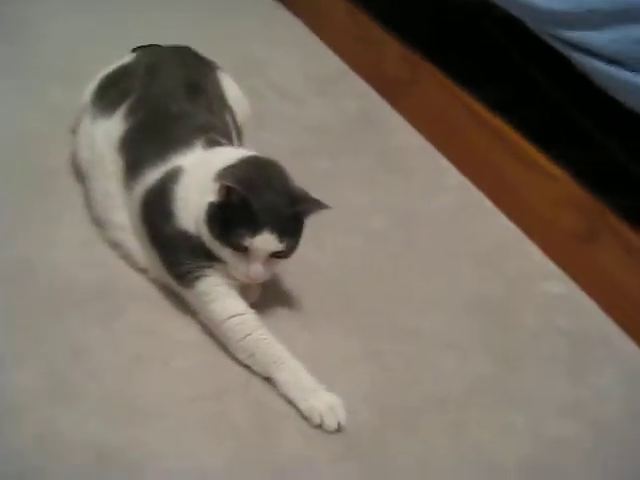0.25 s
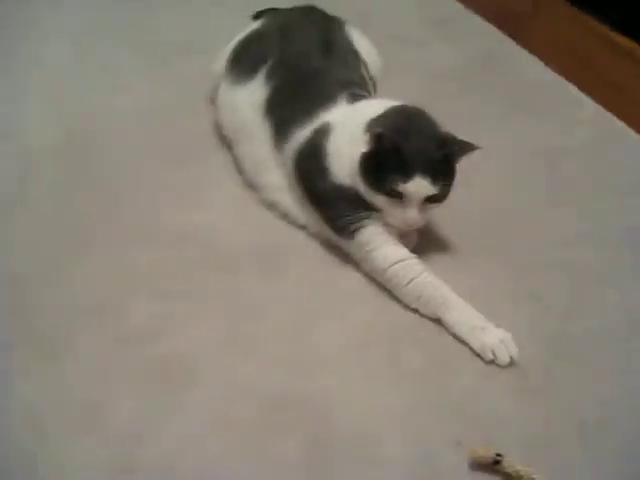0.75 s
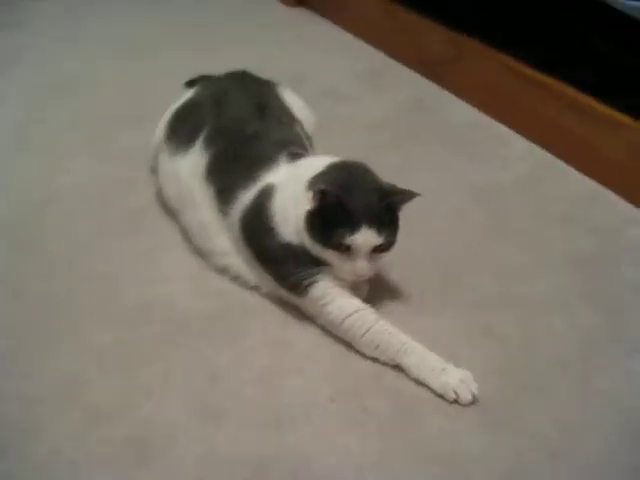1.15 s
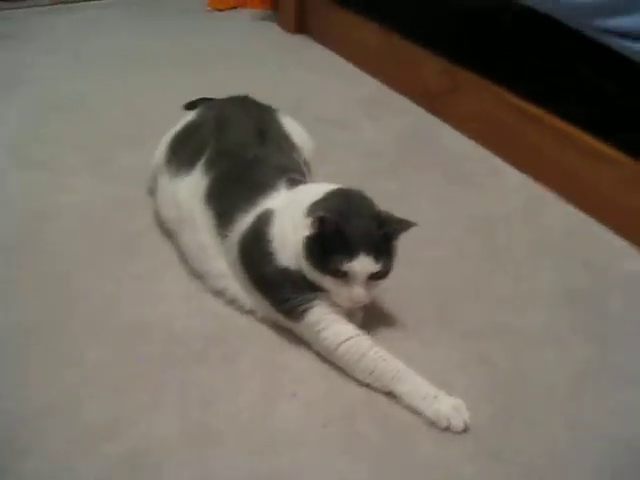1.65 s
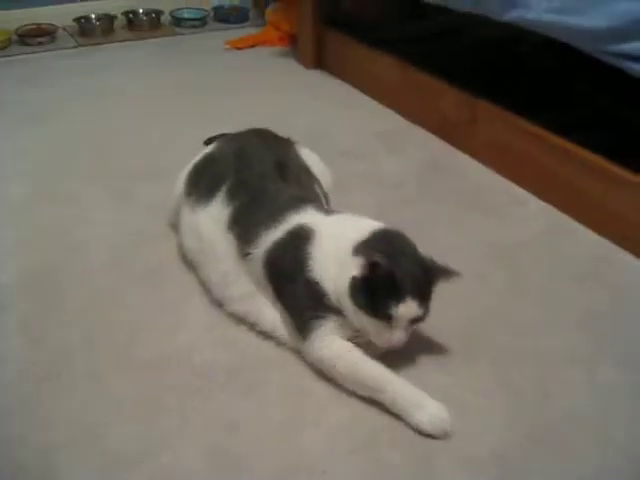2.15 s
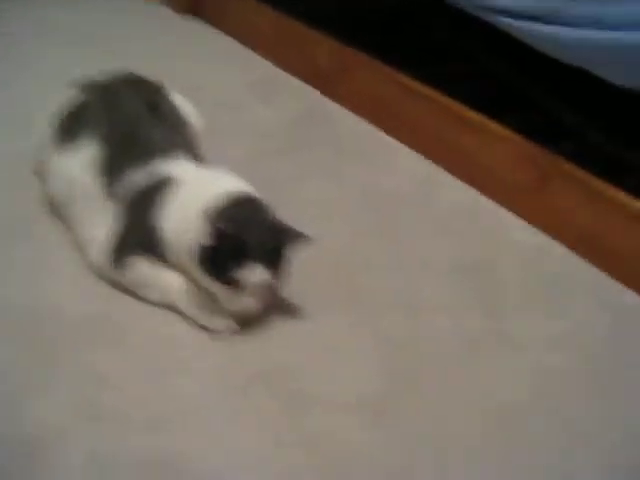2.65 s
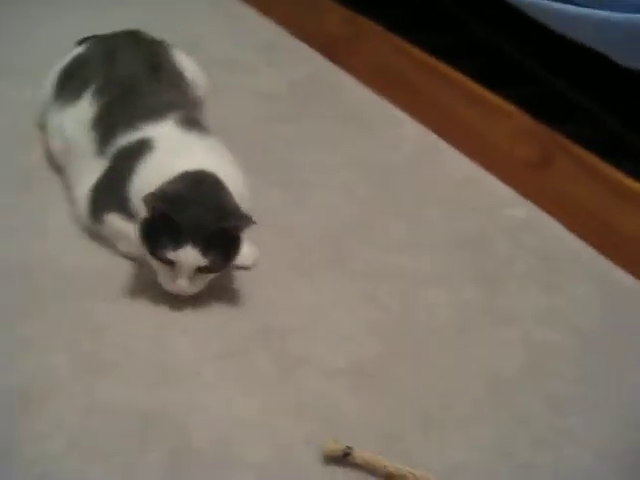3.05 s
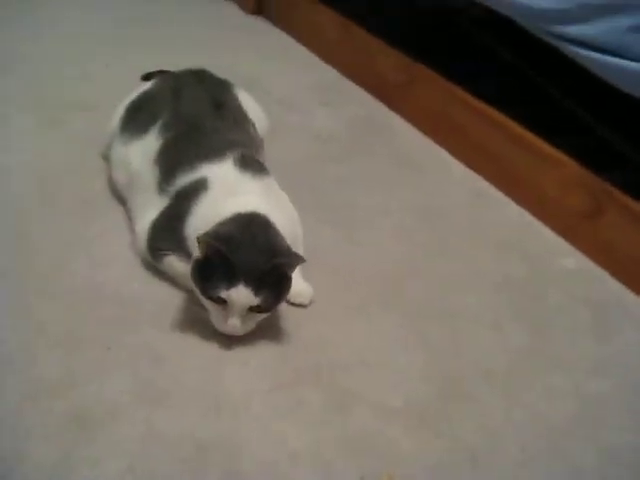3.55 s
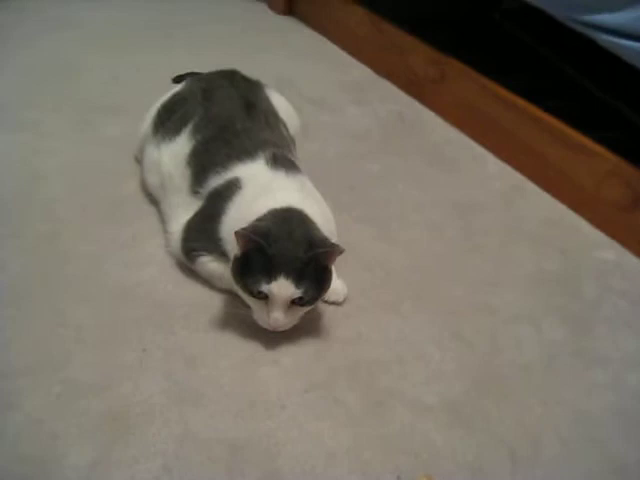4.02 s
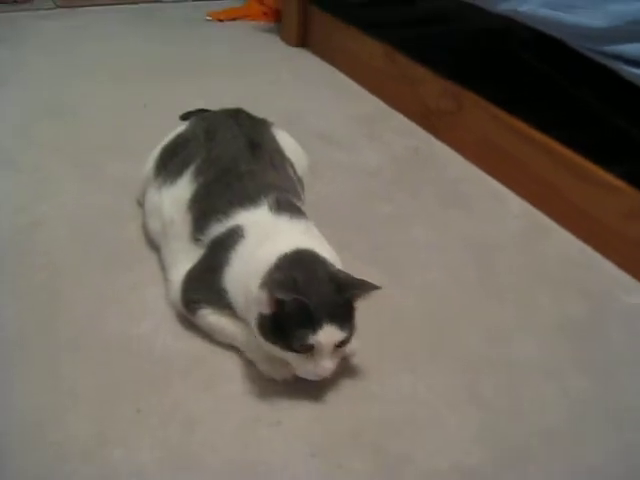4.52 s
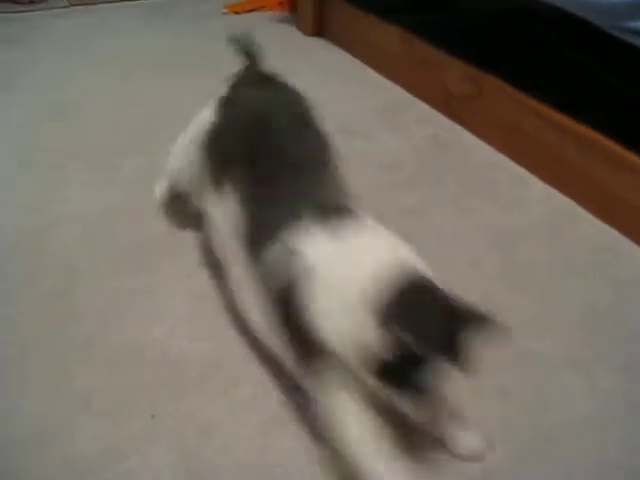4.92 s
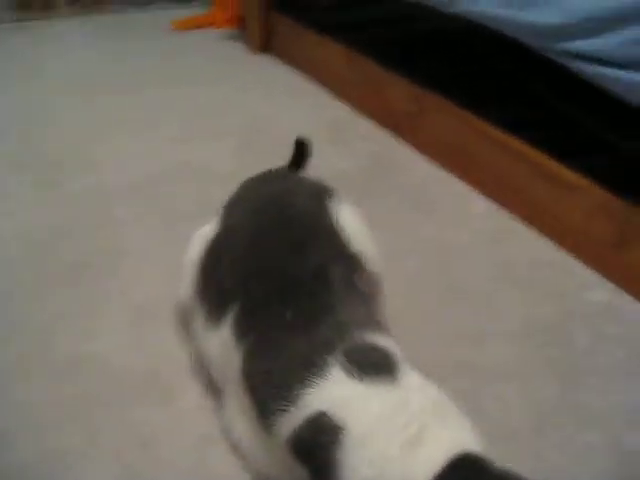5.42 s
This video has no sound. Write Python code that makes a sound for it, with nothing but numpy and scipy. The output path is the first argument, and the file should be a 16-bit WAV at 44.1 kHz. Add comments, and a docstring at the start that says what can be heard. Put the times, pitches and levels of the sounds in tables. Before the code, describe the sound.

A quiet room with a steady low hiss, heard close and dry through a hand-held camera. Right at the start a sharp plastic click sounds, followed by quick scuffs of fingers on the casing and smaller clicks until about 0.9 seconds. The rubbing returns at 1.2 seconds and thickens into a cluster of rasps and ticks around 1.7 to 1.9. From 2.1 to 2.8 seconds come lighter scrapes, tiny fingernail squeaks and, at 2.5, one faint, brief metal ping. After a lull with a few small ticks, the loudest click snaps at about 3.75 seconds with a slight bump, trailed by short scuffs. Only hiss remains from 4 seconds. At about 4.9 a cat gets up: its fur brushes the carpet in one soft, uneven swell, with four faint, muffled paw thuds, fading by 5.5 seconds.

```python
"""Cat on a carpet, with handling noise

A cat paws at a carpet in a quiet room, then gets up and pads away with soft thuds and a rustle of fur.
The close scuffs and clicks are most likely fingers shifting on a small hand-held camera: stick-slip
friction drives the modes of its plastic shell. A nail squeaks, and one touch pings a small metal part.
Under it all lie room noise and hiss."""
import sys
import numpy as np
from scipy import signal
from scipy.fft import rfft, irfft, next_fast_len
from scipy.io import wavfile
from scipy.ndimage import uniform_filter1d, map_coordinates

SR = 44100
rng = np.random.default_rng(int(sys.argv[2]) if len(sys.argv) > 2 else 0)


def dump_mix(stems):
    """Bounce the given channels to the path in sys.argv[1] as a 16-bit WAV at rate SR."""
    frames = np.atleast_2d(stems).T  # one column per channel
    limited = np.clip(frames, -1, 1)  # hard clip at full scale
    pcm = np.round(limited * 32767).astype(np.int16)
    wavfile.write(sys.argv[1], SR, pcm)


N = 250488

# Modes of the plastic shell. Each row: frequency in Hz, 60 dB decay time in seconds, level in dB.
SHELL_MODES = [(884, 0.027, -17.5), (1200, 0.02, -18), (1488, 0.022, -8), (1707, 0.034, -1),
               (1950, 0.03, -15)]


def amp(db):
    """Amplitude ratio of a level in decibels."""
    return 10 ** (np.asarray(db) / 20)


def unit(x):
    """Normalisation to rms 1."""
    return x / np.sqrt(np.mean(x ** 2) + 1e-20)


def clock():
    """The time of every sample in seconds."""
    return np.arange(N) / SR


def noise():
    """White Gaussian noise: equal mean power at all frequencies."""
    return rng.standard_normal(N)


def add(track, start_s, sound):
    """Superposition: the sound is added to the track from start_s on."""
    start = max(round(start_s * SR), 0)
    track[start:start + len(sound)] += sound[:max(len(track) - start, 0)]


def filtered(x, response):
    """Linear filtering: the spectrum of x is multiplied by a frequency response."""
    size = next_fast_len(len(x) + SR // 20)
    hz = np.fft.rfftfreq(size, 1 / SR)
    return irfft(rfft(x, size) * response(hz), size)[:len(x)]


def coloured(x, points):
    """Spectral shaping by a curve through (Hz, dB) points, at rms 1."""
    point_hz, db = np.transpose(points)
    return unit(filtered(x, lambda hz: amp(np.interp(np.log(hz + 1), np.log(point_hz), db))))


def ringing(modes):
    """Impulse response: each (Hz, 60 dB decay time, dB) mode is a damped sinusoid."""
    t = np.arange(SR // 8) / SR
    return sum(amp(db - 60 * t / t60) * np.sin(2 * np.pi * hz * t) for hz, t60, db in modes)


def driven(force, modes):
    """Forced vibration: the force is convolved with the impulse response of the modes."""
    return signal.fftconvolve(force, ringing(modes))[:len(force)]


def shell_treble(x):
    """Resonance: the shell's upper modes lift narrow bands of x; the result has rms 1."""
    # Upper resonances. Each row: centre in Hz, width in Hz, lift in dB.
    peaks = [(2630, 210, 5), (3330, 110, 2), (4030, 120, 5), (4550, 200, 1.5), (5500, 180, 5),
             (5860, 130, 4), (6370, 140, 1.5)]

    def response(hz):
        return amp(sum(db / (1 + (2 * (hz - centre) / width) ** 2) for centre, width, db in peaks))
    return unit(filtered(x, response))


def friction(size, slips_per_s, spread_db, smooth):
    """Stick-slip friction: random uneven impulses, with a share `smooth` of the power as steady noise."""
    strength, side, hiss = rng.standard_normal((3, size))
    slipping = rng.random(size) < slips_per_s / SR
    slips = slipping * amp(spread_db * np.clip(strength, -2, 2)) * np.sign(side)
    return np.sqrt(1 - smooth) * unit(slips) + np.sqrt(smooth) * hiss


def room(noise_db=-54.5, shell_db=-68, whine_db=-85, whine_hz=15734):
    """Stationary noise: room sound and hiss, faint resonance of the shell, and a thin high whine."""
    # Spectrum of the background. Each row: frequency in Hz, relative level in dB.
    spectrum = [(12, -38), (20, -11.5), (95, -5), (126, -5.5), (225, -5.5), (478, -8), (811, -6),
                (1010, -9.5), (1200, -5), (1720, -8.5), (2030, -11.5), (6540, -18.5), (7950, -23.5),
                (10500, -21.5), (15500, -26.5)]
    background = amp(noise_db) * coloured(noise(), spectrum)
    shell = amp(shell_db) * unit(driven(noise(), SHELL_MODES))
    whine = amp(whine_db) * np.sqrt(2) * np.sin(2 * np.pi * whine_hz * clock())
    return background + shell + whine


def finger_slides(edge_s=0.0034, swell_db=9, ease_db=7, treble_growth=1.5,
                  focus_db=6, focus_half_width_hz=600, fizz_db=-18, fizz_lift_db=7.5, fast_hz=5870):
    """Sliding friction under rising, then easing pressure: coarse slips ring the shell, fine ones hiss."""
    # Finger strokes. Each row: start, attack and release in seconds, level in dB,
    # rasp in dB relative to that level, rasp centre in Hz.
    strokes = [(0, 0.0036, 0.034, -36.5, -20, 4200), (.037, .025, 0.041, -33, -18.5, 5200),
               (.089, .012, 0.033, -41.5, -13, 5000), (.168, .06, 0.071, -54.5, -14, 5200),
               (.289, 0.041, 0.07, -43, -14.5, 3100), (.479, .018, .105, -45, -3.5, 6500),
               (.59, 0.037, 0.061, -44, -6, 3700), (.681, .06, .1, -48.5, -9, 4800),
               (.83, .064, .018, -42.5, -2.5, 5900), (1.218, .05, .045, -45, -19, 3000),
               (1.328, 0.015, 0.062, -43.5, -13.5, 3000), (1.478, .004, 0.055, -51, -7, 3900),
               (1.56, 0.088, 0.083, -50, -3.5, 4400), (1.668, 0.017, 0.02, -42, -1, 3930),
               (1.732, 0.012, 0.036, -36, -14.5, 5800), (1.8, .017, 0.0072, -33.5, -12, 6100),
               (1.841, 0.025, 0.051, -47.5, -17, 5200), (2.13, 0.071, .035, -56, -8, 5800),
               (2.197, 0.061, 0.034, -39, -2, 5820), (2.315, 0.012, .06, -46, -8, 6000),
               (2.409, .031, .06, -61.5, 4, 6360), (2.547, 0.09, .1, -50.5, -11.5, 4500),
               (2.735, .028, .022, -52, -5, 7520), (3.589, 0.0043, 0.014, -41, -7, 2800),
               (3.669, .013, .07, -52.5, -9, 3400), (3.781, 0.07, 0.061, -54.5, -10, 3000),
               (3.885, .02, 0.015, -37, -3, 5850), (3.924, .009, 0.0068, -38, -3.5, 5900)]
    # Spectra of the dull rub, dry rasp and fine fizz. Each row: frequency in Hz, relative level in dB.
    rub_spectrum = [(150, -26), (500, -32), (820, -6.5), (1100, 1), (1450, 5.5), (1900, -2), (2400, -13.5),
                    (4000, -34)]
    rasp_spectrum = [(1400, -53), (2200, -6), (2650, 2.5), (3100, 2), (3500, 0.5), (4200, -2), (4900, -3.5),
                     (5800, -2.5), (6600, -4.5), (7600, -16), (9500, -45)]
    fizz_spectrum = [(6000, -21), (8300, 0.5), (9500, 3), (11000, -1.5), (13200, 1.5), (16000, -6)]
    track, t = np.zeros(N), np.arange(SR // 4) / SR
    for start, attack, release, db, rasp_db, rasp_hz in strokes:
        length = attack + release
        contact = np.clip(np.minimum(t, length - t) / edge_s, 0, 1)
        from_peak = np.abs(np.interp(t, [0, attack, length], [-1, 0, 1]))
        pressure = contact * amp(-np.where(t < attack, swell_db, ease_db) * from_peak ** 1.5)
        coarse = pressure * friction(len(t), slips_per_s=700, spread_db=4, smooth=0.2)
        drag = pressure * friction(len(t), slips_per_s=600, spread_db=4.5, smooth=0.25)
        fine = pressure ** treble_growth * friction(len(t), slips_per_s=3000, spread_db=2.5, smooth=0.34)
        fine += 0.35 * coarse
        # a dull stroke is soft skin, which damps the shell's ring into a broad rub
        softness = np.clip(-rasp_db / 24, 0.05, 0.5)
        ring = coloured(driven(coarse, SHELL_MODES), [(200, -16), (700, 1)])
        body = np.sqrt(1 - softness) * ring + np.sqrt(softness) * coloured(drag, rub_spectrum)
        # a faster slide rasps higher and fizzes much more
        focus = lambda hz: amp(focus_db / (1 + ((hz - rasp_hz) / focus_half_width_hz) ** 2))
        rasp = unit(filtered(shell_treble(coloured(fine, rasp_spectrum)), focus))
        fizz = amp(fizz_db + fizz_lift_db * (rasp_hz / fast_hz) ** 4) * coloured(fine, fizz_spectrum)
        stroke = body + amp(rasp_db) * (rasp + fizz)
        duty = np.mean(t < length)  # refers the rms level to the time in contact
        add(track, start, amp(db) * stroke * np.sqrt(duty))
    return track


def ticks(rise_s=0.0006):
    """Noise transients: brief high treble ticks, some alone, some the bright edge of a finger click."""
    # Treble ticks. Each row: time of the peak in seconds, level in dB.
    bursts = [(0.0152, -37.5), (0.164, -39.5), (.672, -42), (1.592, -48), (1.7207, -37), (1.834, -35.5),
              (3.577, -40)]
    envelope, t = np.zeros(N), np.arange(SR // 50) / SR
    for peak_s, db in bursts:
        add(envelope, peak_s - rise_s, amp(db) * t / rise_s * np.exp(1 - t / rise_s))
    return envelope * coloured(noise(), [(4000, -21), (8500, -7), (11000, 1), (14000, 1), (16000, -6)])


def finger_clicks(ring_db=-12.5, grip_damping=0.17, build_s=0.0021, crack_lift_db=3, crack_decay_s=0.0012):
    """Elastic release: a catch lets go, and the shell flexes for a few cycles, cracks and rings on."""
    # Catches and slips. Each row: time in seconds, flex level in dB, pitch in Hz, flex length in
    # seconds, crack in dB relative to the flex before crack_lift_db is added.
    catches = [(.016, -2.5, 1475, 0.00098, -24.5), (0.0282, -18.5, 1480, .0006, -13),
               (.0435, -20, 1610, 0.0012, -19), (0.1643, -7.5, 1385, 0.00067, -20.5),
               (0.3385, -19.5, 1630, 0.0012, -12), (0.486, -25, 1640, 0.0017, -9),
               (0.5238, -12.5, 1200, 0.00072, -16.5), (.592, -27, 1690, 0.0014, -16),
               (1.0656, -22, 1620, .0011, -12.5), (1.3345, -30, 1470, .0027, -16),
               (1.475, -22, 1100, .0007, -13.5), (1.6497, -20, 1490, .00081, -6.5),
               (1.722, -19, 1610, 0.0028, -13.5), (1.774, -22.5, 1570, .0018, -21),
               (1.823, -20.5, 1540, 0.0029, -19), (1.8355, -19.5, 1675, 0.0043, -17.5),
               (1.958, -33, 1570, .0015, -24), (2.3402, -21.5, 1600, .0016, -21),
               (2.388, -28, 1700, 0.0035, -22), (2.4953, -29.5, 1640, .0018, -8),
               (2.655, -28, 1640, .0018, -9.5), (2.6649, -24.5, 1610, .0018, -31),
               (2.7346, -33, 1530, .0017, -25), (2.792, -33.5, 1600, 0.0019, -21),
               (2.901, -27, 1070, 0.00073, -29), (3.0606, -33.5, 1380, 0.00064, -22),
               (3.5945, -24.5, 1560, 0.00042, -12.5), (3.7545, -6, 1530, 0.0011, -18.5),
               (3.7578, 2, 1590, 0.0023, -30), (3.802, -25.5, 1580, 0.001, -19),
               (3.8755, -27.5, 1780, 0.00048, -8), (3.8879, -18, 1590, 0.0015, -3.5),
               (5.0242, -29.5, 1080, 0.00088, -18.5)]
    # The shell's deep knock. Each row: frequency in Hz, 60 dB decay time in seconds, level in dB.
    knock_modes = [(892, 0.02, -35)]
    flexes, rings, crack_envelope = np.zeros((3, N))
    lead_s = 0.01  # each pulse begins ahead of its peak
    t = np.arange(SR // 8) / SR - lead_s
    ring = ringing(SHELL_MODES) * (1 - np.exp(-(t + lead_s) / build_s))  # builds as the flexing dies
    for peak_s, db, hz, length, crack_db in catches:
        pulse = 1 / np.cosh(np.clip(2.95 * t / length, -50, 50))
        phase = 2 * np.pi * hz * t + rng.normal(0, 0.26)
        add(flexes, peak_s - lead_s, amp(db) * pulse * np.cos(phase))
        # a firm grip damps the ring, which loses grip_damping dB for each dB of force
        add(rings, peak_s, amp(ring_db + (1 - grip_damping) * db) * ring)
        burst = np.where(t < 0, pulse, np.exp(-np.abs(t) / crack_decay_s))
        add(crack_envelope, peak_s - lead_s, amp(db + crack_db + crack_lift_db) * burst)
    # so small a shell radiates little bass
    flexes = signal.sosfilt(signal.butter(3, 620, "high", fs=SR, output="sos"), flexes)
    # Spectrum of a crack. Each row: frequency in Hz, relative level in dB.
    crack_spectrum = [(300, -26), (1500, 6.5), (2600, 2.5), (4300, 2.5), (5200, -4.5), (6200, -2),
                      (7500, -16.5), (10000, -20.5), (16000, -27.5)]
    cracks = crack_envelope * shell_treble(coloured(noise(), crack_spectrum))
    return flexes + driven(flexes, knock_modes) + rings + cracks


def grip_bumps(low_cut_hz=140, t60_s=0.016):
    """Heavily damped oscillation: the firmest slips jolt the whole camera, and the hand stills it."""
    # Jolts. Each row: start in seconds, frequency in Hz, level in dB before the low cut.
    jolts = [(.05, 240, -39), (1.72, 230, -32), (1.834, 240, -38), (3.756, 310, -36)]
    track = np.zeros(N)
    for start, hz, db in jolts:
        add(track, start, ringing([(hz, t60_s, db)]))
    return signal.sosfilt(signal.butter(2, low_cut_hz, "high", fs=SR, output="sos"), track)


def nail_squeaks(waver_hz=250):
    """Stick-slip oscillation: a nail chatters on the plastic for a moment at one unsteady pitch."""
    # Squeaks. Each row: time of the peak in seconds, length in seconds, pitch in Hz, peak level in dB.
    squeaks = [(2.2, .012, 4600, -48), (2.442, .03, 6200, -54), (2.468, 0.0029, 6150, -43),
               (2.655, 0.0035, 3550, -35), (3.8745, 0.0014, 2900, -31)]
    track, t = np.zeros(N), np.arange(SR // 5) / SR - 0.1
    for peak_s, length, hz, db in squeaks:
        waver = unit(uniform_filter1d(rng.standard_normal(len(t)), size=30))
        phase = 2 * np.pi * np.cumsum(hz + waver_hz * waver) / SR
        envelope = np.exp(-2 * (t / length) ** 2)
        add(track, peak_s + t[0], amp(db) * envelope * np.sin(phase))
    return track


def metal_ping(start_s=2.494):
    """Free vibration: a small metal part, flicked once, rings briefly in its inharmonic modes."""
    # Modes of the part. Each row: frequency in Hz, 60 dB decay time in seconds, level in dB.
    modes = [(3430, 0.091, -43.5), (4000, 0.082, -47), (4996, 0.055, -39), (7020, 0.026, -40)]
    track = np.zeros(N)
    add(track, start_s, ringing(modes))
    return track


def fur_rustle(start_s=4.87, attack_s=0.074, hold_s=0.29, release_s=0.32,
               level_db=-52, brushes_per_s=18, brush_db=2):
    """Friction noise: as the cat gets up, its fur brushes the pile in one uneven swell."""
    # Spectrum of fur on pile. Each row: frequency in Hz, relative level in dB.
    spectrum = [(200, -8), (700, -8), (1400, 0), (2400, -4.5), (4000, -11.5), (6000, -9.5), (10000, -10.5),
                (16000, -11.5)]
    motion = np.interp(clock(), start_s + np.cumsum([0, attack_s, hold_s, release_s]), [0, 1, 1, 0])
    flutter = map_coordinates(rng.standard_normal(400), [clock() * brushes_per_s])
    fibres = coloured(friction(N, slips_per_s=1500, spread_db=8, smooth=0.55), spectrum)
    return amp(level_db + brush_db * flutter) * motion * fibres


def paw_thuds(attack_s=0.015, t60_s=0.33):
    """Cushioned impact: each soft paw lands with a decaying burst of low noise."""
    # Pawfalls. Each row: start in seconds, level in dB.
    pawfalls = [(4.935, -53), (5.06, -52), (5.108, -45.5), (5.165, -60)]
    # Spectrum of a thud. Each row: frequency in Hz, relative level in dB.
    spectrum = [(20, -10), (55, -3), (115, 0), (200, -4), (400, -8.5), (800, -9.5), (2000, -32)]
    weight, t = np.zeros(N), np.arange(SR // 2) / SR
    onset = np.minimum(t / attack_s, 1)
    decay_db = 60 * np.maximum(t - attack_s, 0) / t60_s
    for start, db in pawfalls:
        add(weight, start, onset * amp(db - decay_db))
    return weight * coloured(friction(N, slips_per_s=120, spread_db=4, smooth=0.6), spectrum)


def limited(x, threshold_db=-4, release_db_per_s=100, attack_s=0.0012):
    """Peak limiting: the gain ducks just after a loud peak and creeps back."""
    excess_db = np.maximum(20 * np.log10(np.abs(x) + 1e-9) - threshold_db, 0)
    recovery_db = release_db_per_s * clock()
    duck_db = np.maximum.accumulate(excess_db + recovery_db) - recovery_db
    lag = np.exp(-1 / (attack_s * SR))
    return x * amp(-signal.lfilter([1 - lag], [1, -lag], duck_db))


def scene():
    """Superposition of direct sound: all sources are close and dry, in one channel."""
    handling = finger_slides() + ticks() + finger_clicks() + grip_bumps() + nail_squeaks() + metal_ping()
    return (room() + handling + fur_rustle() + paw_thuds())[None]


def record(dry, ceiling=0.72, notch_hz=7900, notch_half_width_hz=620, top_hz=16050):
    """Overload and band limiting: the camera ducks and clips peaks, notches the treble, cuts the top."""
    clipped = np.clip(limited(dry[0]), -ceiling, ceiling)
    notch = lambda hz: np.abs(hz - notch_hz) / np.hypot(hz - notch_hz, notch_half_width_hz)
    return filtered(clipped, lambda hz: notch(hz) * (hz < top_hz))[None]


dry = scene()
out = record(dry)
dump_mix(out)
```